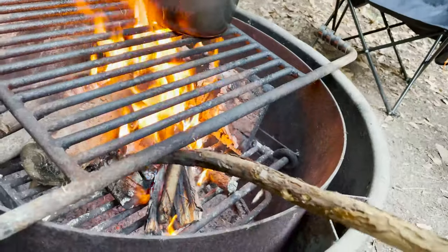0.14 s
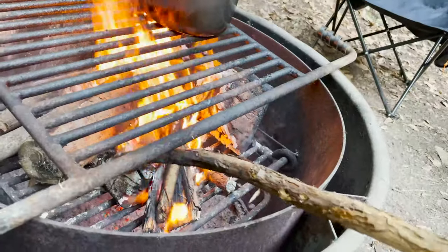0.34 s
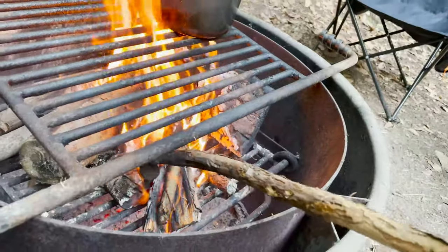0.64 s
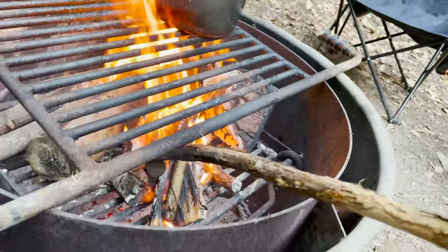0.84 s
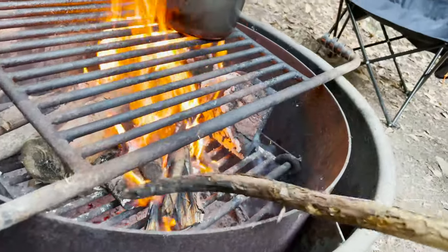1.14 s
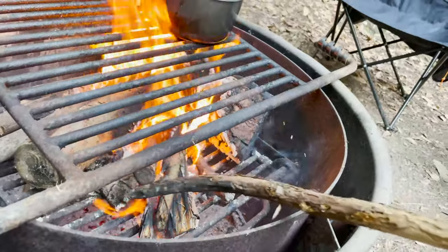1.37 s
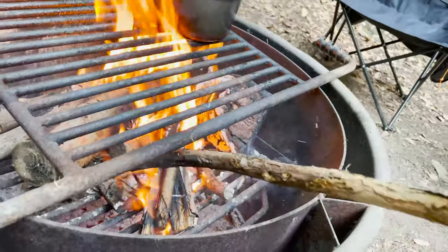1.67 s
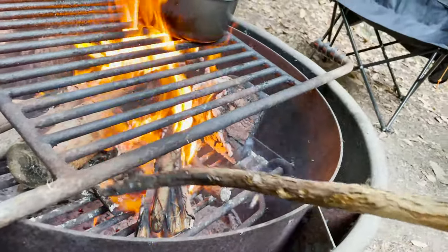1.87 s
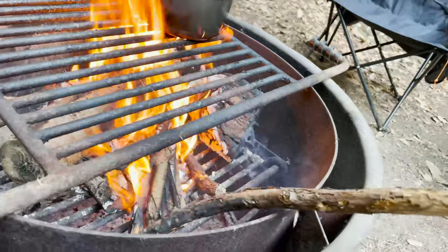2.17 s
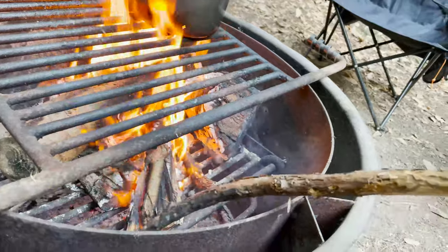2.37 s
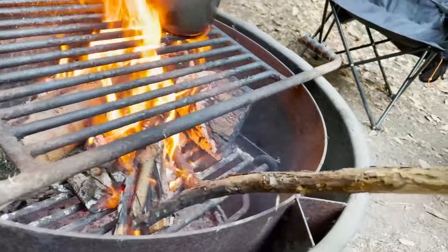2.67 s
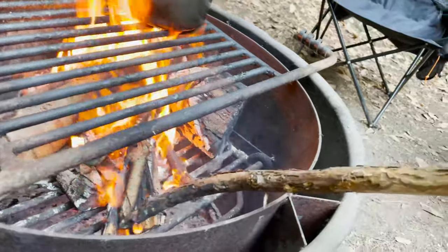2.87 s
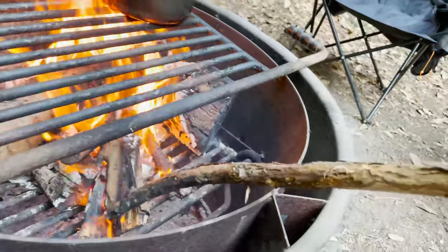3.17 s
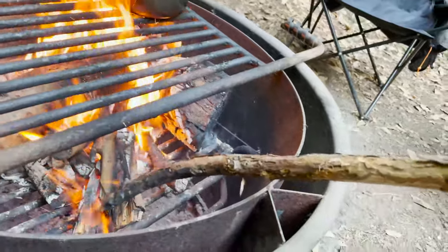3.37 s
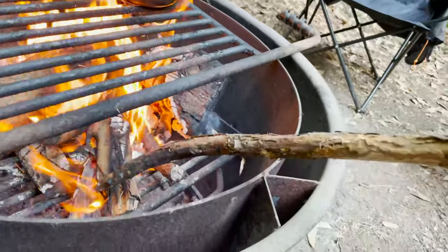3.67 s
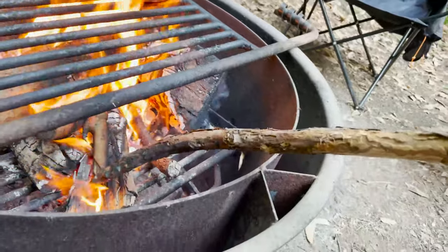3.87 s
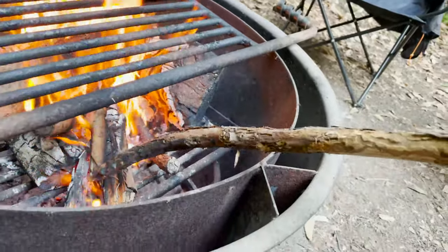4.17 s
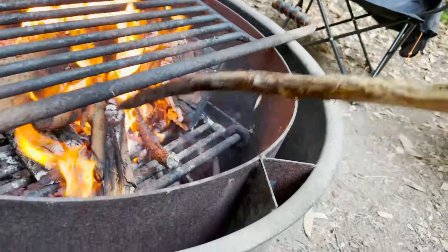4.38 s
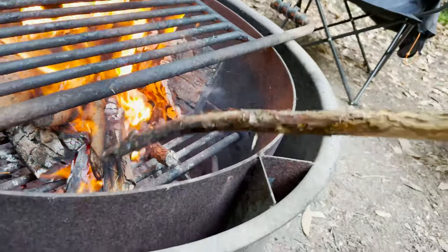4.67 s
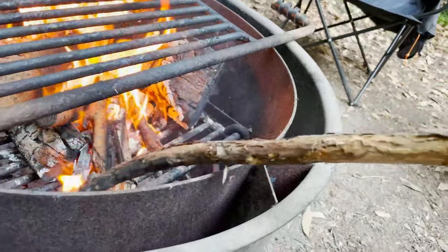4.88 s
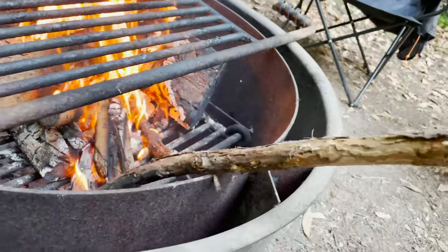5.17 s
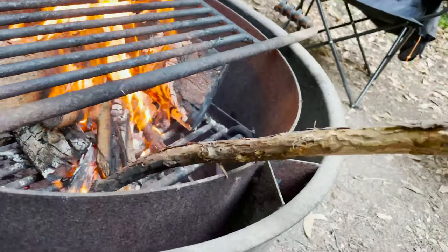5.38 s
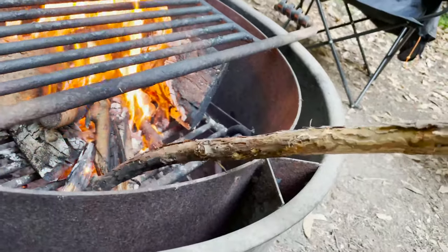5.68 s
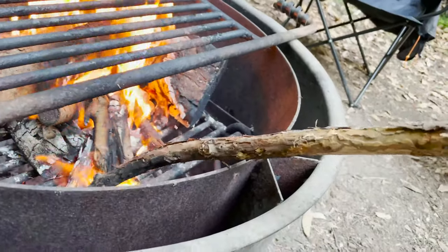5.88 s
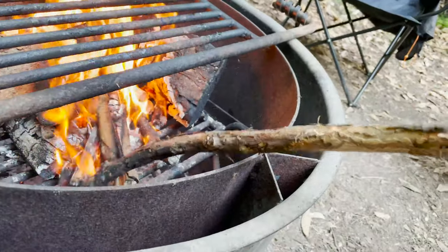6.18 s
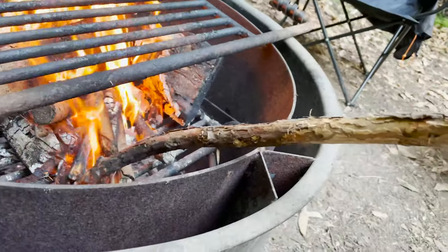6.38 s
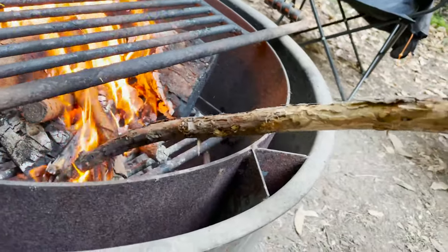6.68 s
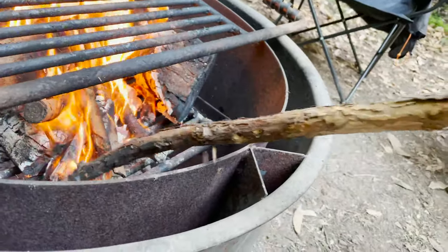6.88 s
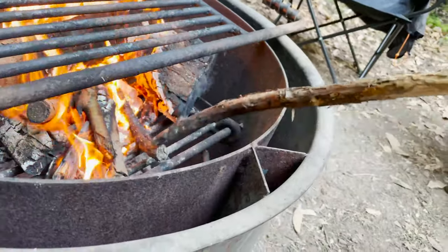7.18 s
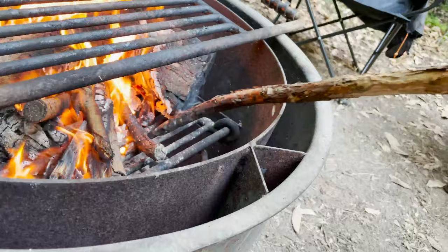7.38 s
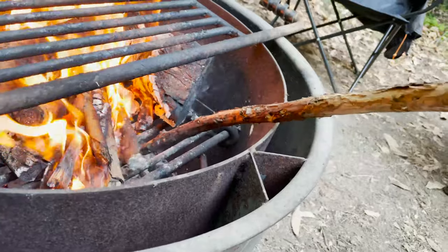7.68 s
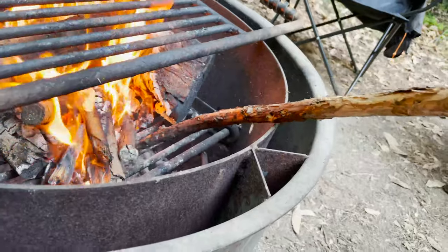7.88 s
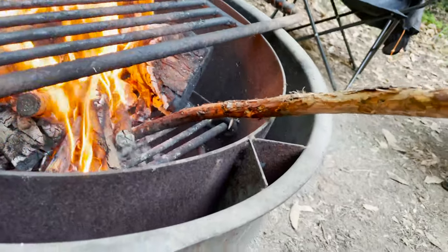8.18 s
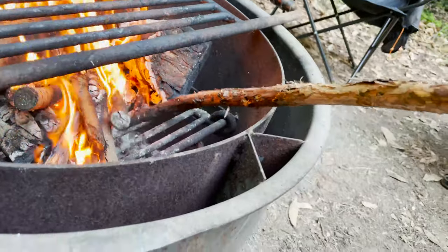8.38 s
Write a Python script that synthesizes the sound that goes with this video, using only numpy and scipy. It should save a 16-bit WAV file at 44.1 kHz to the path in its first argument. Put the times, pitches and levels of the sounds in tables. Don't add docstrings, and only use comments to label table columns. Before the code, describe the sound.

A close outdoor wood fire hisses and crackles finely over a low drone, with constant sharp snaps, pops and a few stick knocks.

```python
import sys
import numpy as np
from scipy import signal
from scipy.fft import rfft, irfft
from scipy.io import wavfile
from scipy.ndimage import uniform_filter1d

SR = 44100
rng = np.random.default_rng(int(sys.argv[2]) if len(sys.argv) > 2 else 0)


def file_out(sig):
    cols = np.atleast_2d(sig).T
    lim = np.clip(cols, -1, 1)
    pcm = np.round(lim * 32767).astype(np.int16)
    wavfile.write(sys.argv[1], SR, pcm)


def magnitude_from_level(level_db):
    exponent = np.asarray(level_db, float) / 20
    return 10 ** exponent


N = 376613

SIDES = np.array([[1], [-1]])
# frequency in Hz, side re mid in dB.
WIDTH = [(60, -23), (120, -11), (240, -10.5), (480, -10), (950, -8.5), (1890, -17), (3770, -17),
         (7520, -13), (15000, -10)]


def rms_one(x):
    return x / np.sqrt(np.mean(x ** 2) + 1e-20)


def at_hz(points, hz):
    points = np.array(points)
    return np.interp(np.log(hz), np.log(points[:, 0]), points[:, 1])


def band(x, low_hz, high_hz):
    edges_hz = [low_hz, min(high_hz, .45 * SR)]
    return signal.sosfilt(signal.butter(2, edges_hz, "band", fs=SR, output="sos"), x)


def drift(rate):
    pole = np.exp(-80 * np.pi * rate / SR)
    noise = rng.standard_normal(N // 40 + 2002)
    slow = signal.lfilter([1], [1, -2 * pole, pole * pole], noise)[2000:]
    return np.interp(np.arange(N) / 40, np.arange(len(slow)), rms_one(slow))


def stereo(mid, side, side_db):
    return mid + magnitude_from_level(side_db) * side * SIDES


def coloured(level, spectrum, patchy_db):
    span_octaves = np.log2(spectrum[-1][0] / spectrum[0][0])
    edges = spectrum[0][0] * 2 ** np.arange(0, span_octaves + .4, .4)
    out = 0
    white = rng.standard_normal((2, 2, N))
    for k, (low, high) in enumerate(zip(edges, edges[1:])):
        hz = np.sqrt(low * high)
        gain = magnitude_from_level(at_hz(spectrum, hz) + patchy_db * drift(5.9))
        mid, side = band(level(hz) * white[k % 2], low, high)
        out = out + gain * stereo(mid, side, at_hz(WIDTH, hz))
    return rms_one(out)


def crackle():
    # frequency in Hz, level in dB per Hz.
    hiss_spectrum = [(240, -47), (400, -3), (623, -1.5), (972, -0.5), (1340, 2.5), (1560, 4.5), (8530, 4),
                     (12100, 1), (15500, -9.5)]
    per_s, spread_db, t60_s, narrow_db = 280, 4.6, .017, 3.0
    smooth_hiss_db = -4

    born = np.flatnonzero(rng.random(N) < per_s * magnitude_from_level(2.5 * drift(14)) / SR)
    size, place = rng.random((2, len(born)))
    size_db = spread_db * np.minimum(-np.log(size), 2.6)
    favoured_hz = 1300 * 11 ** place

    def level(hz):
        clicks = np.full(N, 1e-18)
        clicks[born] = magnitude_from_level(2 * (size_db - narrow_db * np.log2(hz / favoured_hz) ** 2))
        power = signal.lfilter([1], [1, -magnitude_from_level(-120 / (t60_s * SR))], clicks)
        hiss_db = smooth_hiss_db + 6 * max(np.log2(1700 / hz), 0)
        return np.sqrt(power / power.mean() + magnitude_from_level(hiss_db) ** 2)

    return coloured(level, hiss_spectrum, patchy_db=.8)


def drone():
    # frequency in Hz, wander in Hz, level in dB.
    tones = [(66.6, 2.29, -2.5), (112, 3.1, -14), (134.9, 2.56, -16), (158.8, 2, -26.5), (284, 9.1, -25)]
    out = 0
    for hz, wander_hz, level_db in tones:
        mid, side = [magnitude_from_level(2.2 * drift(7)) * np.sin(2 * np.pi * np.cumsum(hz + wander_hz * drift(12)) / SR)
                     for _ in SIDES]
        out = out + magnitude_from_level(level_db) * stereo(mid, side, at_hz(WIDTH, hz))
    return out


def roar(drone_db):
    # frequency in Hz, level in dB per Hz.
    roar_spectrum = [(15, -39), (25, -4), (49, -2.5), (81, 2.5), (137, 0), (204, -17), (267, -7),
                     (485, -23.5), (600, -11.5), (780, -56), (1320, -120)]
    roar_db = -48 - 0.17 * (drone_db + 47)
    return magnitude_from_level(roar_db) * coloured(np.ones_like, roar_spectrum, patchy_db=1.7)


def wood_bursts():
    # start in
    # seconds, crack in dB, brightness in dB, favoured pitch in Hz.
    snaps_right = [(.0045, -39, 10.5, 6800), (.1586, -43, 10.5, 8300), (.3848, -27, 4.5, 7500),
                   (.9128, -32.5, -7, 2200), (.9653, -42, 2, 9200), (1.0852, -38.5, 7.5, 5240),
                   (1.5403, -31, -6, 2250), (1.6608, -41, -3, 2340), (1.6835, -39.5, 0, 4220),
                   (3.8040, -25, 8, 8000), (4.4396, -45, -2, 4870), (4.2666, -43, 9.5, 9600),
                   (5.9572, -40, 5, 3270), (6.0468, -42, 6, 4890), (6.2902, -31, 9, 4800),
                   (7.0182, -40.5, 5, 5450), (7.3427, -33.5, 1, 4470), (7.4582, -41, 16, 5640),
                   (7.9273, -31.5, -2, 6770), (8.0004, -26.5, -1, 1710), (8.0361, -34.5, -2, 2500)]
    snaps_left = [(.4282, -34, 7.5, 7450), (.4822, -29, 5, 6400), (.6611, -35.5, 3.5, 10300),
                  (4.8383, -43.5, 6, 8000), (5.0702, -44.5, 4, 9000), (.6798, -31, 3, 3070),
                  (.8206, -45, 9, 5030), (1.1544, -38, -1, 3060), (1.5071, -25, 2.5, 8000),
                  (1.6241, -37.5, 7, 5900), (1.7268, -32, 0, 3070), (1.843, -29, 3.5, 9400),
                  (2.0958, -40.5, 3.5, 5150), (2.7201, -36.5, 6, 5130), (2.8153, -29.5, 2, 3850),
                  (3.2677, -36.5, 1, 3580), (5.2895, -30.5, -7, 2450), (5.5657, -31.5, -9, 5000),
                  (5.6341, -36.5, -7, 2720), (5.9905, -39.5, 4.5, 2110), (6.1455, -43, 7.5, 8180),
                  (6.3954, -43.5, 10, 8350), (6.5045, -29.5, 2.5, 5040), (8.5251, -37, -8, 2350)]
    pops_right = [(.6929, -32.5, 4.5, 5430), (1.2955, -36.5, 6.5, 5750), (1.5344, -34, 1, 4220),
                  (1.6405, -39.5, 3, 5000), (2.3146, -40.5, -1, 3540), (2.5769, -40, -2, 2610),
                  (3.1644, -37, -1, 2480), (3.1838, -35, 5.5, 7300), (3.2293, -41.5, -11, 3000),
                  (3.5035, -38, 6, 3100), (3.5811, -34, 1.5, 6400), (3.6809, -36.5, 0, 2850),
                  (3.9382, -35, -2, 3600), (4.0776, -34, 10.5, 7700), (4.9978, -35, 0, 5340),
                  (5.4343, -34, -1, 3570), (5.4838, -29.5, 4.5, 7300), (6.486, -39.5, 3, 8900),
                  (6.778, -36.5, 1, 1630), (7.1531, -37.5, 3, 5200), (7.2657, -33, -1, 2930),
                  (7.8504, -27, 1, 6460), (7.87, -31, 2, 4700), (7.9924, -32.5, 2, 2480),
                  (8.3913, -43, 10.5, 7450), (8.4466, -38, 4, 7620)]
    pops_left = [(.7384, -36.5, 0, 5370), (1.0595, -41, 0, 1650), (1.1251, -39, 0, 8070),
                 (1.2876, -42.5, 9, 1500), (1.7564, -35.5, -1, 6200), (2.1477, -42, 9, 8960),
                 (2.7416, -36, 6, 7500), (3.6014, -38.5, 0, 2500), (4.1783, -37, 4, 2420),
                 (4.7008, -36, 6, 5500), (4.7817, -35, 5, 7240), (4.9333, -42, 3, 2700),
                 (5.1038, -41, -6, 3490), (5.6488, -35, 4, 6030), (5.881, -28.5, -1.5, 2340),
                 (5.917, -40.5, 7, 5150), (6.0639, -39.5, 7, 5060), (6.3238, -31.5, 3, 4030),
                 (6.3856, -35.5, 2, 6740), (6.6791, -37.5, -6, 3980), (7.0339, -36.5, 1, 5300),
                 (7.4702, -31, 5, 8040), (7.6628, -30.5, 1.5, 9300), (8.2163, -39, 7.5, 6700),
                 (8.418, -20.5, 3.5, 4280), (8.4692, -37.5, -5, 2600)]
    deep_cracks = [
        (3.1118, -35.5, -7, 1300),
        (4.6498, -26.5, -14, 1540),
        (7.92, -38, 2, 2900),
        (1.161, -31.5, -2, 2370),
        (3.335, -44, 0, 1830),
        (2.1909, -35, 4, 4100),
    ]
    # rows, body in dB, left-right in dB
    kinds = [(snaps_left, -17.5, 2), (snaps_right, -17.5, -2), (pops_left, -5.5, 2), (pops_right, -5.5, -2),
             (deep_cracks, -0.5, 2.5)]
    return sorted((s, crack_db, body_db, edge_db, hz, pan_db)
                  for rows, body_db, pan_db in kinds
                  for s, crack_db, edge_db, hz in rows)


def ticks():
    # start in seconds, level in dB, favoured pitch in Hz.
    char_ticks = [(0.11, -37.5, 3060), (0.6222, -35.5, 2480), (0.805, -39, 1570), (1.0156, -37, 2760),
                  (1.3344, -34, 4270), (1.3572, -37, 2220), (1.551, -36, 2140), (1.715, -33, 2620),
                  (2.264, -38, 4570), (2.45, -37, 3700), (2.983, -37, 3660), (3.125, -35.8, 4410),
                  (3.4891, -37.5, 1740), (3.8952, -35, 2500), (4.0037, -36.5, 4460), (4.3453, -37, 2610),
                  (4.4149, -36, 4100), (4.5628, -39.5, 1850), (4.7218, -33.5, 2930), (5.0903, -38, 4440),
                  (5.111, -34.5, 2830), (5.8655, -34.5, 2390), (5.9824, -39, 1340), (6.3764, -32, 4410),
                  (6.6392, -35.5, 4080), (6.8452, -34.5, 3060), (7.0466, -35.5, 2540), (7.2, -34, 2360),
                  (7.5329, -40.5, 2130), (8.146, -37.5, 4850)]
    ember_ticks = [(0.2485, -36.5, 5070), (0.456, -37, 8250), (1.1897, -36.5, 6870), (1.806, -31, 7750),
                   (2.5974, -36.5, 7100), (2.6103, -32, 6030), (2.958, -39, 4970), (2.9732, -37.4, 8800),
                   (4.0708, -31, 9670), (4.336, -36, 6010), (4.3863, -36.2, 5060), (4.5934, -36, 6140),
                   (4.693, -32, 7710), (4.763, -31, 5500), (4.9623, -40, 7150), (5.2047, -33.5, 9900),
                   (5.3088, -38, 6200), (6.0297, -38, 7820), (6.2396, -32.5, 7820), (6.829, -37, 8630),
                   (6.9237, -29, 7600), (6.9465, -39, 7040), (6.9957, -36.5, 5160), (7.1077, -40, 8160),
                   (7.284, -34, 10290), (7.4874, -34, 5790), (7.6907, -31.5, 6500), (7.7141, -35, 6140),
                   (8.0988, -38, 7800), (8.1978, -36.5, 5460)]
    s, level_db, ring_hz = np.transpose(char_ticks + ember_ticks)
    octaves = np.log2(ring_hz / 4000)
    body_db, edge_db = -10 - 9.1 * octaves, 0.83 + 1.0 * octaves
    return np.transpose([s, level_db - 6.5, body_db, edge_db, ring_hz, rng.normal(0, 2.5, len(s))])


def pops(rows):
    # low edge in Hz, high edge in Hz, level in dB, side re mid in dB.
    pop_bands = [(604, 1310, -9, -20), (990, 2990, 6.5, -20), (1960, 6900, 6.5, -22), (5150, 11460, 0, -17),
                 (10600, 13400, -20.5, -12)]
    # scatter t60 in seconds, tail level in dB, tail t60 in seconds.
    pop_decays = [(.045, -8, .11), (.038, -9, .11), (.024, -14, .095), (.022, -16, .09), (.02, -19, .07)]
    s, crack_db, body_db, edge_db, ring_hz, pan_db = np.transpose(rows)
    t = np.arange(SR // 10) / SR
    luck = rng.random((len(s), 2))
    noise = rng.standard_normal((len(s), 2, len(t)))
    swell_s = 0.00063 + 0.00188 * luck[:, :1]
    noise *= magnitude_from_level(2.97 * np.minimum(rng.exponential(1, (len(s), 1, len(t))), 5))
    noise *= magnitude_from_level(4.5 * np.exp(-((t - swell_s) / .0001) ** 2))[:, None]

    octaves = np.log2((np.fft.rfftfreq(len(t), 1 / SR) + 1) / ring_hz[:, None, None])
    partners = np.cos(2 * np.pi * octaves * (.9 + .8 * luck[:, :1, None]))
    favour_db = 5.3 * np.exp(-(octaves / 0.27) ** 2) + 1.4 * partners
    noise = irfft(rfft(noise) * magnitude_from_level(favour_db), len(t))

    late = np.maximum(t - swell_s, 0) / (.65 + .6 * luck[:, 1:])
    rise = magnitude_from_level(-6 * np.maximum(1 - t / swell_s, 0))
    bursts = 0
    colours_db = (body_db, body_db, 0 * s, edge_db, edge_db)
    for pop_band, decay, colour_db in zip(pop_bands, pop_decays, colours_db):
        low, high, level_db, side_db = pop_band
        t60, tail_db, tail_t60 = decay
        envelope = rise * np.hypot(magnitude_from_level(-60 * late / t60), magnitude_from_level(tail_db - 60 * late / tail_t60))
        mid, side = np.swapaxes(band(noise * envelope[:, None], low, high), 0, 1)
        strength = np.sqrt(np.sum(mid ** 2, axis=1) / (SR * .006))
        gain = magnitude_from_level(crack_db + colour_db + level_db) / strength
        bursts = bursts + stereo(mid[:, None], side[:, None], side_db) * gain[:, None, None]

    out = np.zeros((2, N + len(t)))
    for start, burst, pan in zip((s * SR).astype(int), bursts, pan_db):
        out[:, start:start + len(t)] += burst * magnitude_from_level(pan / 2 * SIDES)
    return out[:, :N]


def knocks():
    # start in seconds, peak in dB, pitch in Hz, t60 in seconds, left-right in dB.
    contacts = [(.119, -34, 624, .022, -7), (0.119, -31.5, 1130, 0.018, -7), (.252, -42.5, 366, 0.088, 3),
                (.295, -38, 288, 0.18, 4), (3.165, -45, 332, .06, -21), (3.17, -28.5, 188.6, .17, 5),
                (3.585, -44, 409, 0.084, 6), (3.61, -46, 677, 0.17, 7), (5.799, -35, 96, 0.059, 2),
                (5.882, -30, 900, .03, 5), (7.032, -28.5, 648, 0.034, -1), (8.24, -43, 271, 0.25, 6)]
    modes = [(1, -3.5), (1.13, -5.5), (1.75, -9.5), (3.4, -5), (5.3, -1)]   # (frequency ratio, dB)
    out, t = np.zeros((2, N + SR)), np.arange(SR // 2) / SR
    for s, peak_db, hz, t60, pan_db in contacts:
        swell_s = 0.0031 + .02 * (t60 / 0.18) ** 4
        contact = 1 - np.exp(-t / swell_s)
        ring = sum(magnitude_from_level(mode_db - 60 * t * ratio / t60) * np.sin(2 * np.pi * hz * ratio * t)
                   for ratio, mode_db in modes)
        start = int(s * SR)
        out[:, start:start + len(t)] += magnitude_from_level(peak_db + 10.5 + pan_db / 2 * SIDES) * contact * ring
    return out[:, :N]


def whooshes():
    # centre in seconds, half length in seconds, low edge in Hz, high edge in Hz, level in dB.
    flaps = [
        (8.28, 0.056, 150, 400, -49),
        (0.26, 0.042, 210, 640, -50),
        (5.81, 0.032, 90, 270, -45.5),
        (3.64, .05, 220, 370, -55),
    ]
    t = np.arange(N) / SR
    air = rng.standard_normal(N) * magnitude_from_level(3.7 * drift(40))
    return sum(magnitude_from_level(level_db) * np.exp(-((t - s) / half_s) ** 2) * rms_one(band(air, low_hz, high_hz))
               for s, half_s, low_hz, high_hz, level_db in flaps)


def needles():
    # centre in seconds, peak in dB, left-right in dB.
    fibres = [
        (6.2919, 0, -1),
        (3.8058, -4, -3),
        (3.8047, -10, -3),
        (8.4207, -2.5, 2),
        (1.7305, -18, 2),
        (6.5065, -13, 3),
        (.3860, -7, -3),
        (.4828, -10, 3),
        (8.0012, -10, -1),
    ]
    out, t = np.zeros((2, N)), np.arange(-32, 32) / SR
    pulse_hz, pulse_s = 9500, .00005
    pulse = np.exp(-(t / pulse_s) ** 2) * np.cos(2 * np.pi * pulse_hz * t + .6)
    for s, peak_db, pan_db in fibres:
        centre = int(s * SR)
        out[:, centre - 32:centre + 32] += magnitude_from_level(peak_db + pan_db / 2 * SIDES) * pulse
    return out


def whistles():
    # start in seconds, end in seconds, pitch in Hz, level in dB.
    jets = [
        (.75, .85, 3150, -47.5),
        (.748, .80, 4420, -47.5),
        (4.472, 4.492, 1800, -41),
        (4.47, 4.488, 2300, -46),
    ]
    out, t = 0, np.arange(N) / SR
    for start, end, hz, level_db in jets:
        swell = np.sin(np.pi * np.clip((t - start) / (end - start), 0, 1))
        phase = 2 * np.pi * np.cumsum(hz * (1 + .006 * drift(40))) / SR
        out = out + magnitude_from_level(level_db + 2.0 * drift(80)) * swell * np.sin(phase)
    return out


def thuds():
    # start in seconds, peak in dB.
    blows = [
        (1.6235, -33.5),
    ]
    delay_s = .0003
    out, t = np.zeros(N + SR), np.arange(1, SR // 10) / SR + delay_s
    wave = np.cos(2 * np.pi * np.log(t / .0013) / np.log(2.3)) * np.exp(-(t / .022) ** 2)
    for s, peak_db in blows:
        out[int((s + delay_s) * SR):][:len(t)] += magnitude_from_level(peak_db) * wave
    return out[:N]


def scene():
    # time in seconds, crackle in dB, drone in dB.
    course = [
        (0, -42.5, -48),
        (.45, -42.5, -48),
        (3.16, -43.5, -36),
        (4.45, -42, -49.5),
        (4.99, -40.5, -45),
        (5.64, -41, -48),
        (6.83, -42.5, -39.5),
        (8.54, -43, -45.5),
    ]
    # centre in seconds, half length in seconds, change in dB.
    lulls = [
        (1.975, 0.098, -2),
        (4.894, 0.033, -4.5),
        (5.16, 0.029, -4),
    ]
    t = np.arange(N) / SR
    s, *columns = np.transpose(course)
    crackle_db, drone_db = [np.interp(t, s, column) for column in columns]
    for centre, half_s, lull_db in lulls:
        crackle_db = crackle_db + lull_db * np.exp(-((t - centre) / half_s) ** 4)
    background = magnitude_from_level(crackle_db) * crackle() + magnitude_from_level(drone_db) * drone() + roar(drone_db)
    cracks = pops(wood_bursts()) + pops(ticks()) + needles()
    stick = knocks() + thuds() + whooshes()
    return background + cracks + stick + whistles()


def roll_off(x):
    return signal.sosfilt(signal.butter(12, 16970, fs=SR, output="sos"), x)


def record(dry):
    cut = signal.sosfilt(signal.butter(2, 40, "high", fs=SR, output="sos"), dry)
    cut = 1.15 * np.tanh(cut / 1.15)
    top_hz, crack_top_hz = 15720, 16600
    below, wide = [signal.sosfiltfilt(signal.ellip(8, .3, 60, hz, fs=SR, output="sos"), cut)
                   for hz in (top_hz, crack_top_hz)]
    top = wide - below
    top_power = uniform_filter1d(np.sum(top ** 2, axis=0), size=128)
    is_sharp = 1. * (top_power > np.quantile(top_power, .982))
    return roll_off(below + uniform_filter1d(is_sharp, size=128) * top)


dry = scene()
out = record(dry)
file_out(out)
```